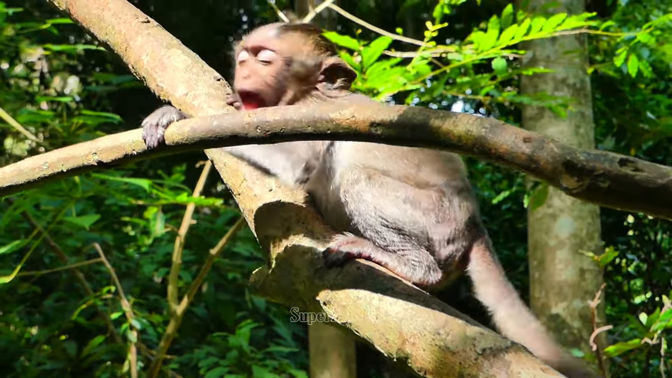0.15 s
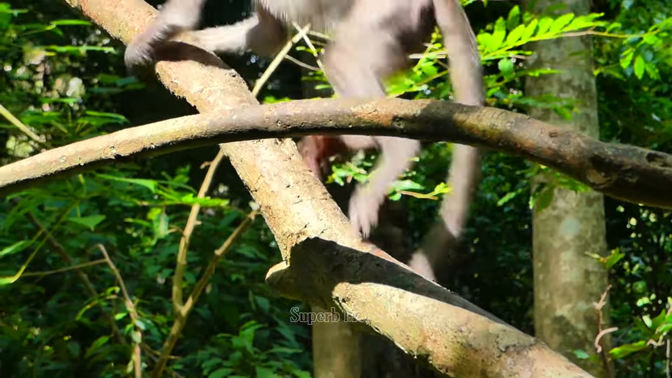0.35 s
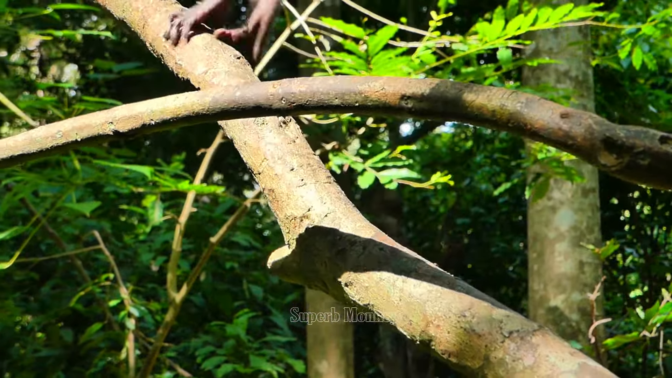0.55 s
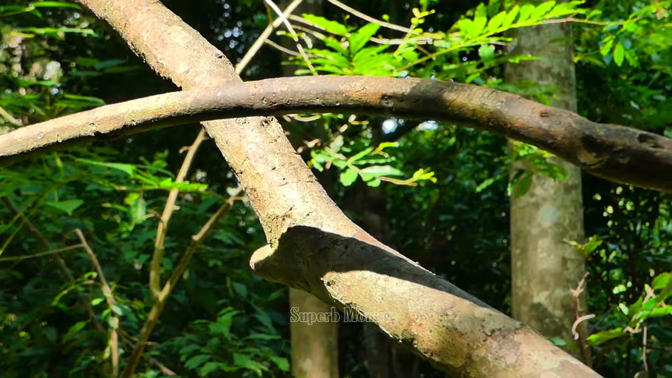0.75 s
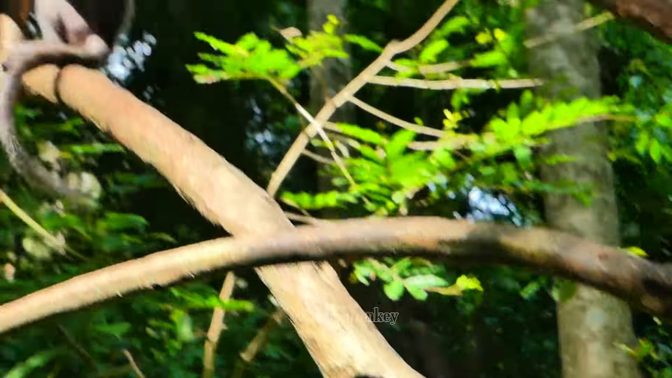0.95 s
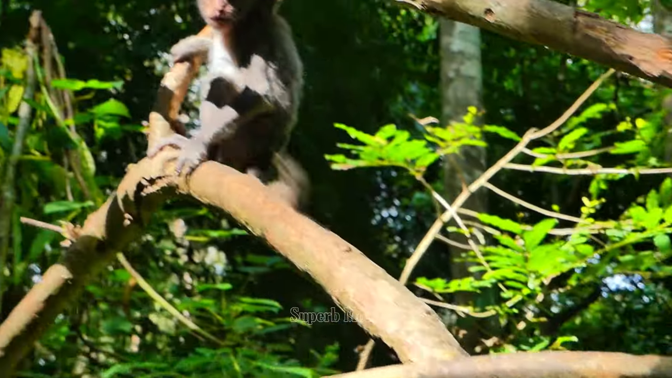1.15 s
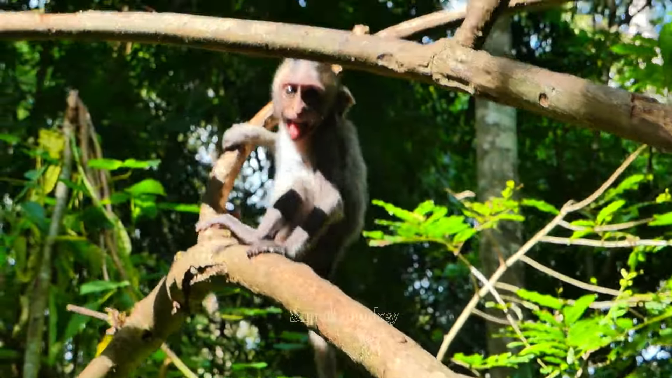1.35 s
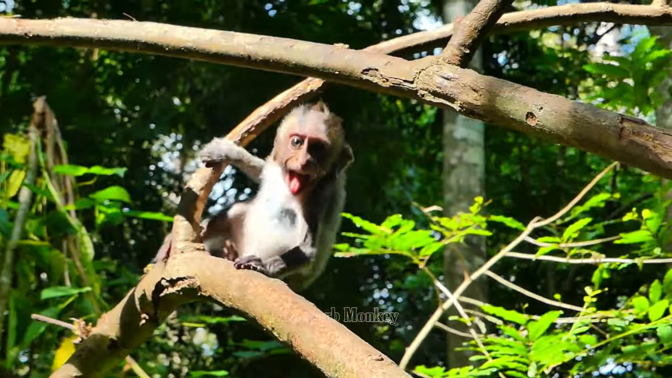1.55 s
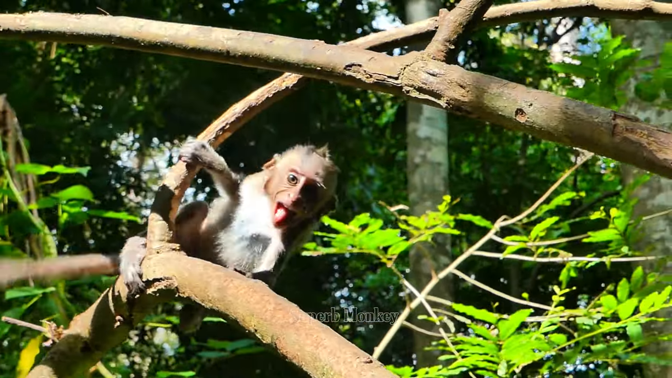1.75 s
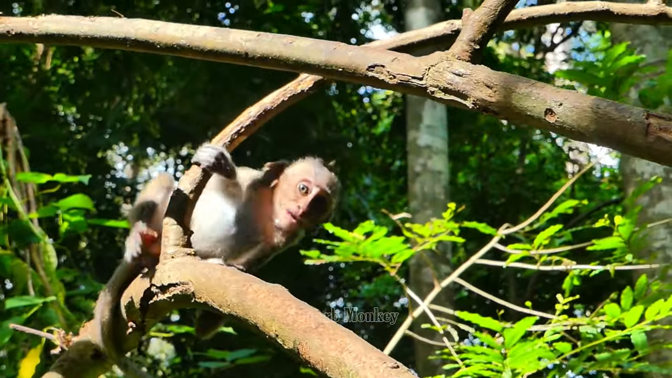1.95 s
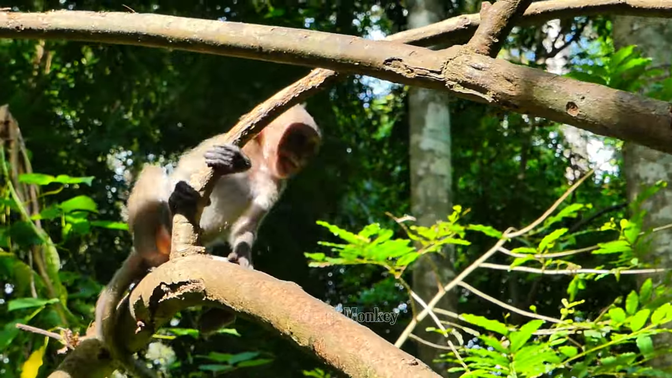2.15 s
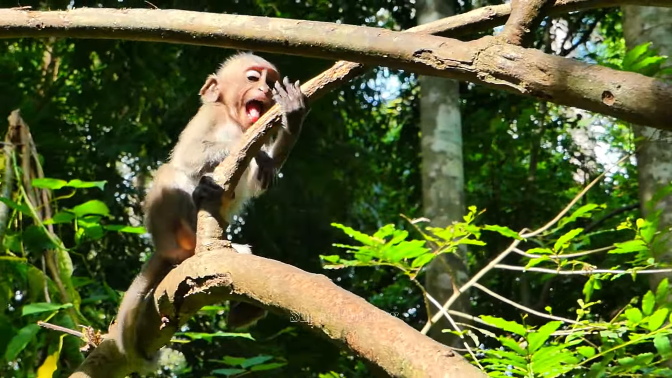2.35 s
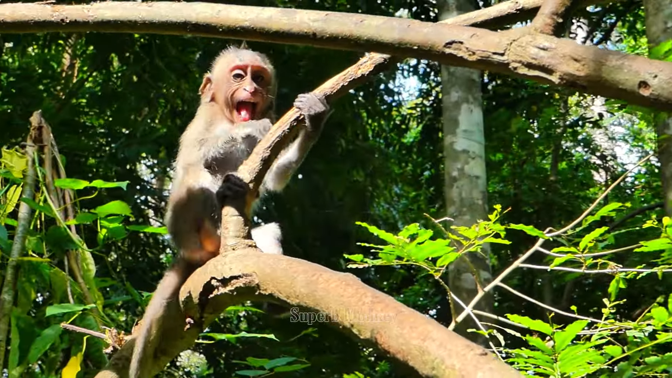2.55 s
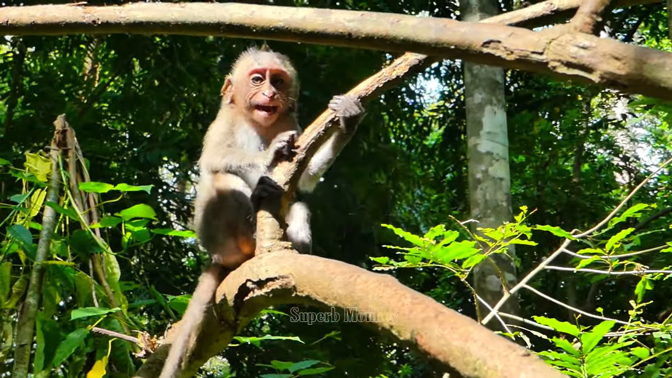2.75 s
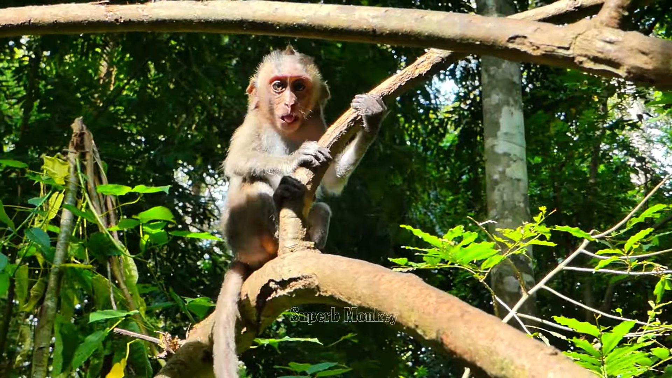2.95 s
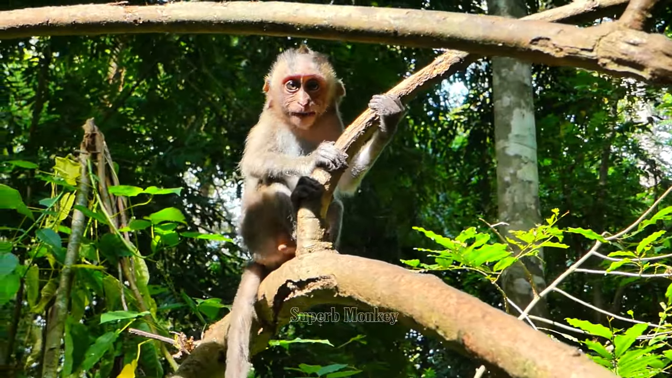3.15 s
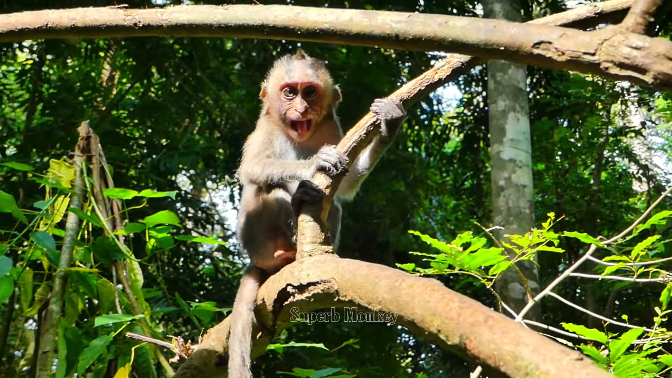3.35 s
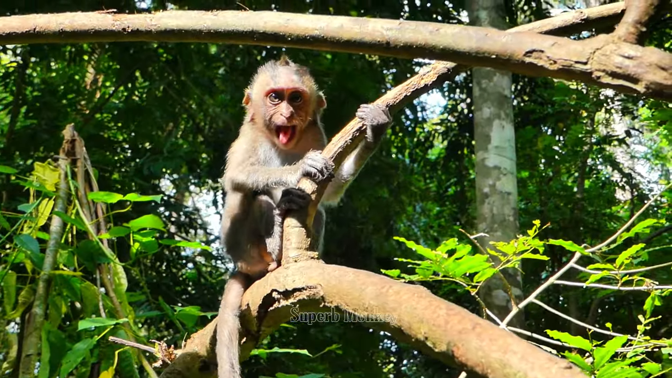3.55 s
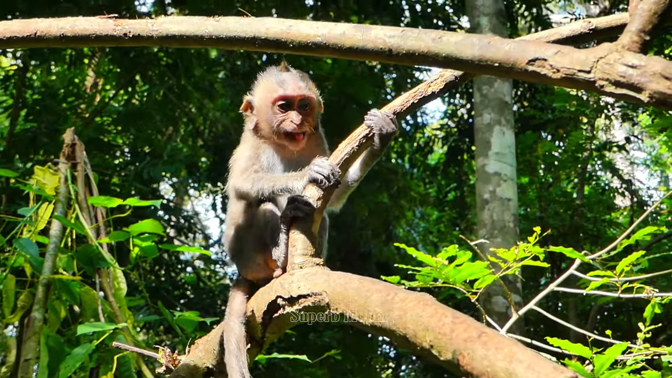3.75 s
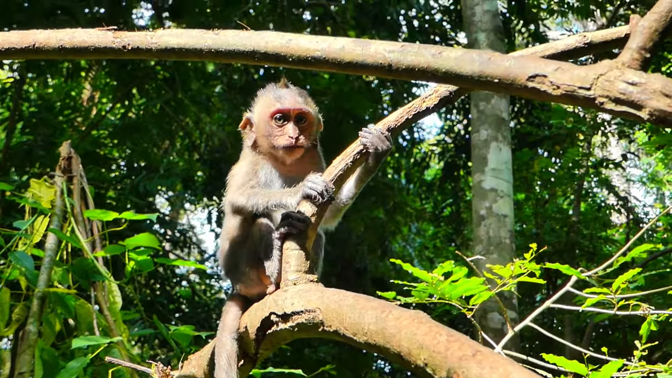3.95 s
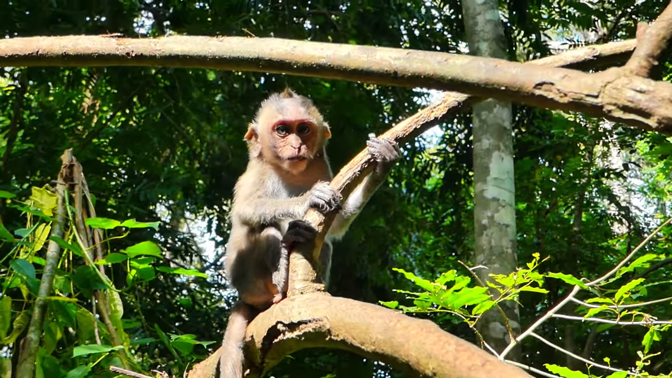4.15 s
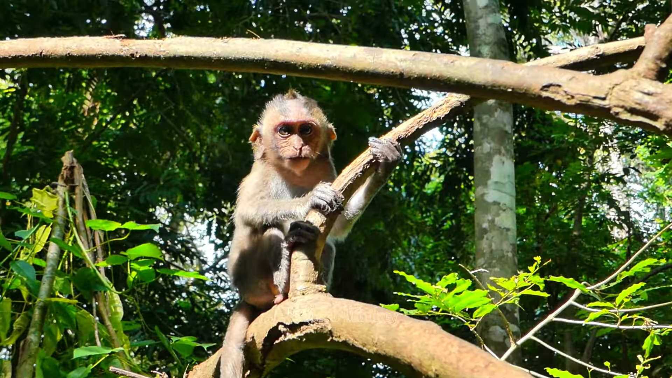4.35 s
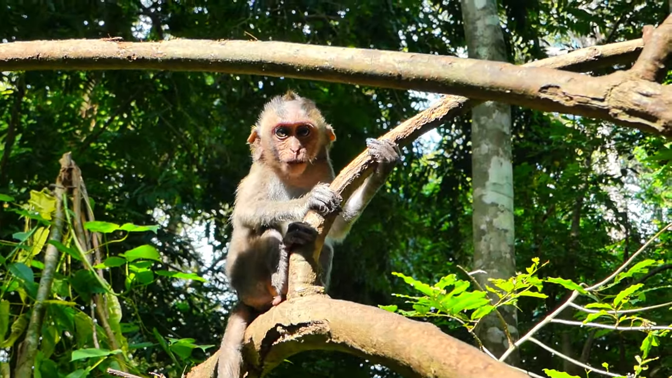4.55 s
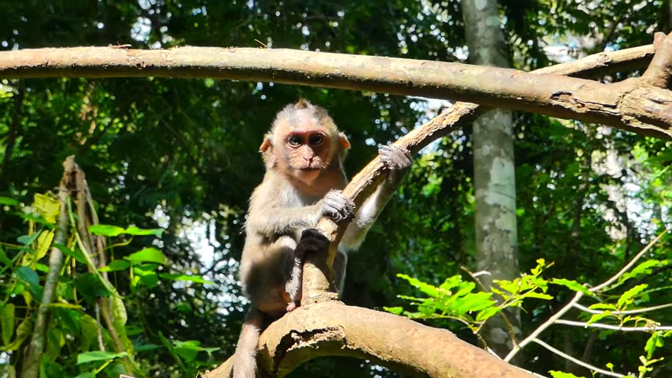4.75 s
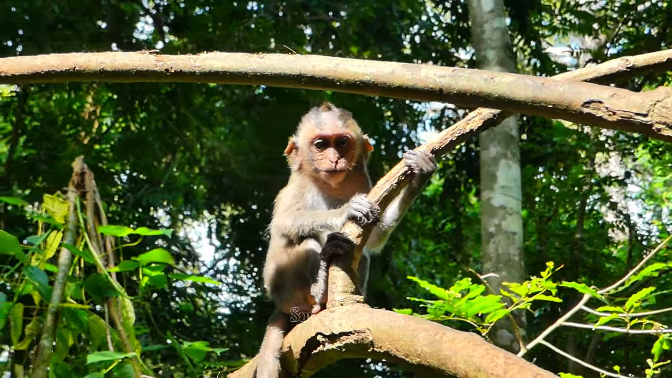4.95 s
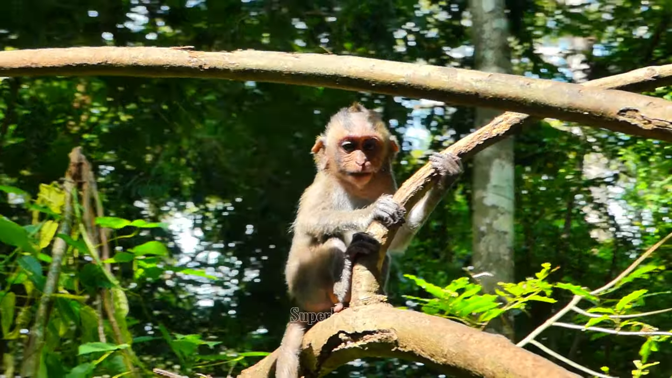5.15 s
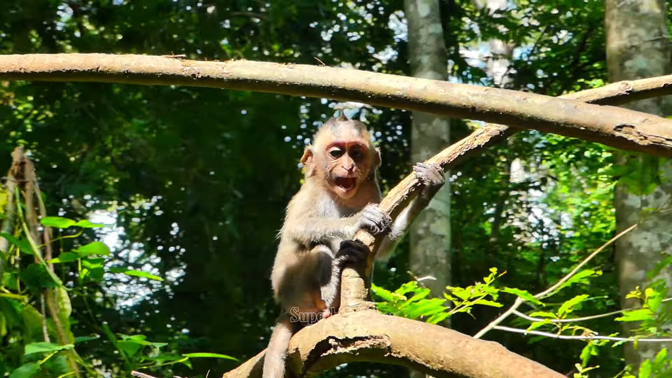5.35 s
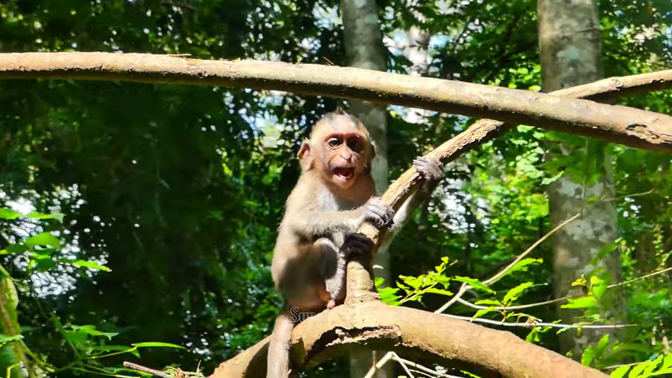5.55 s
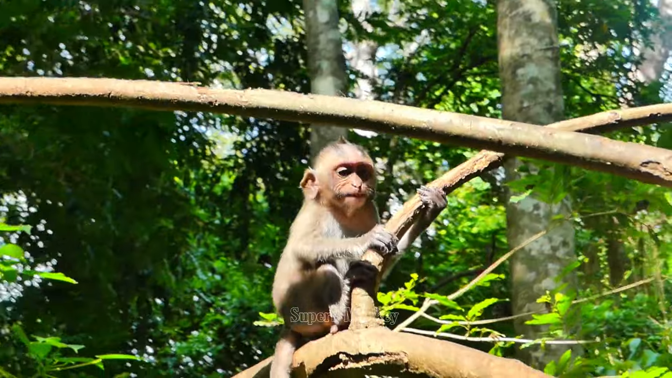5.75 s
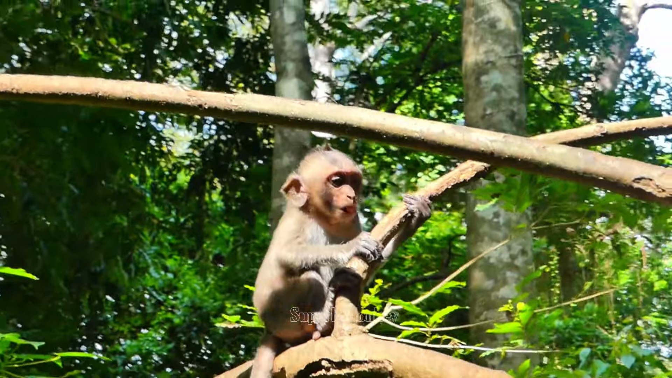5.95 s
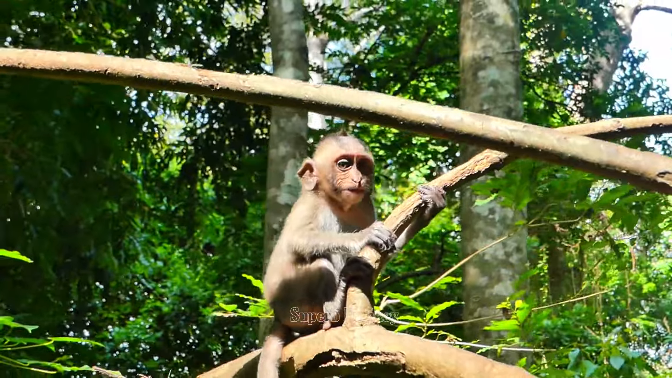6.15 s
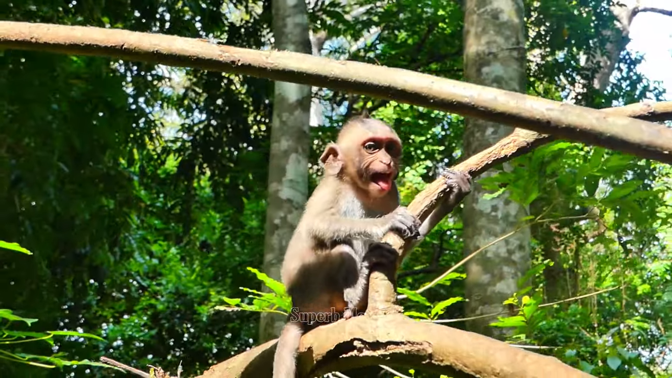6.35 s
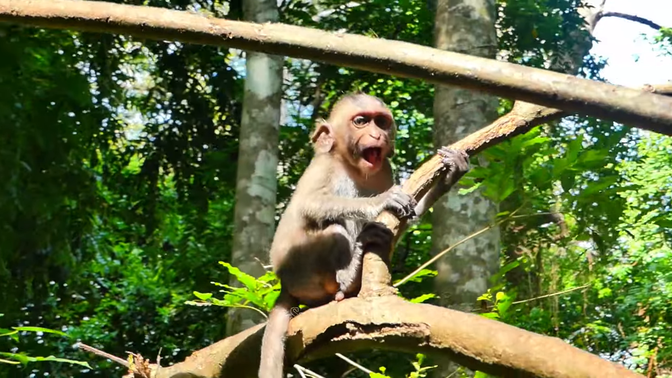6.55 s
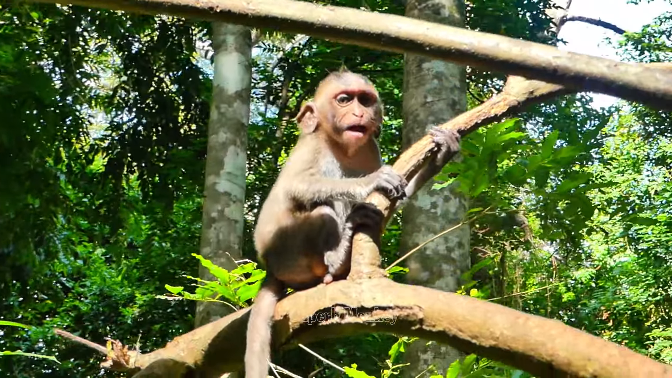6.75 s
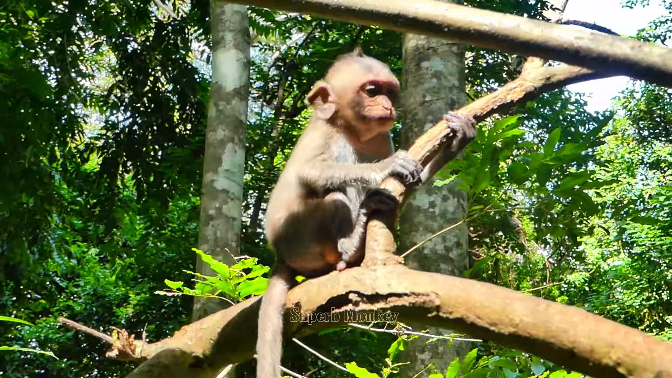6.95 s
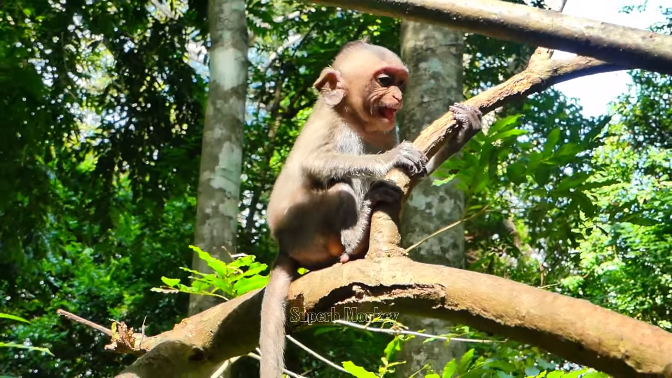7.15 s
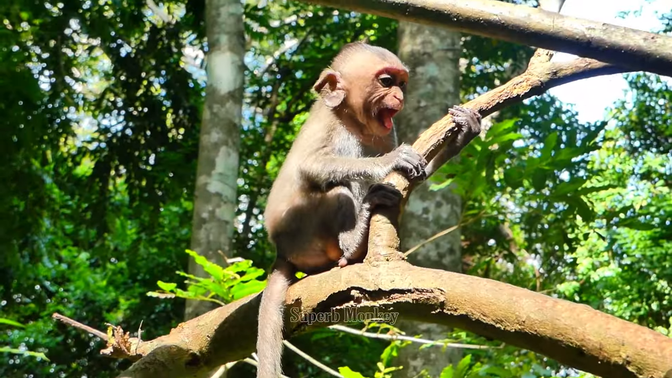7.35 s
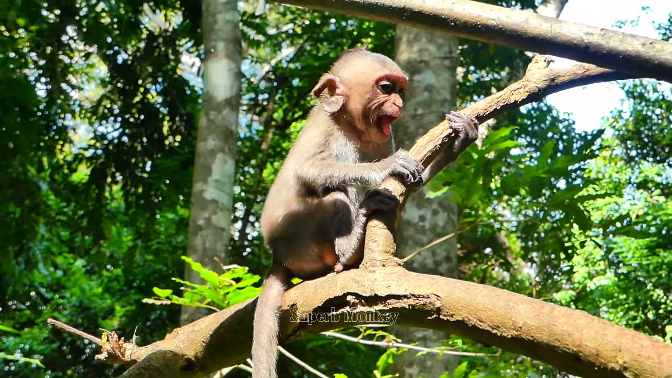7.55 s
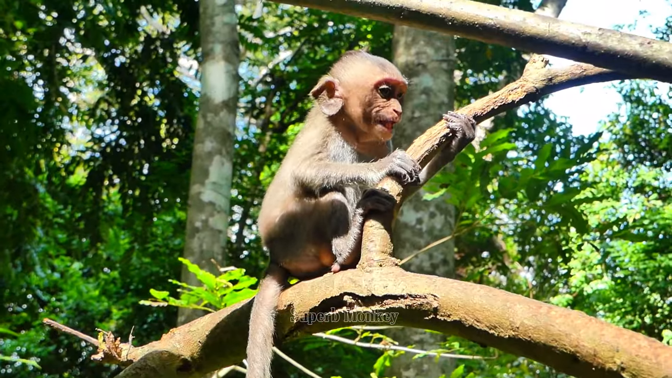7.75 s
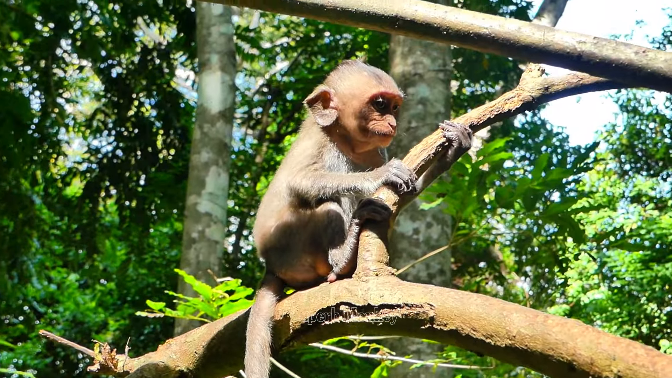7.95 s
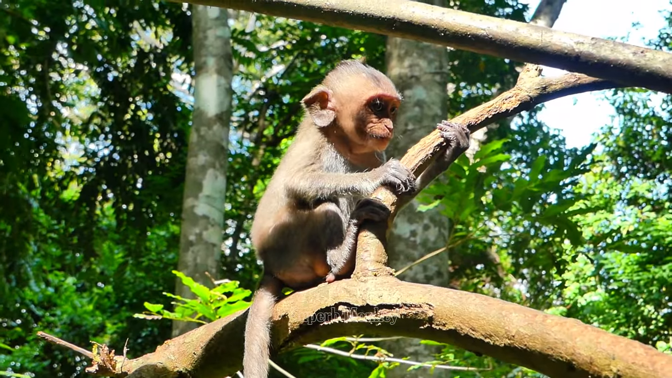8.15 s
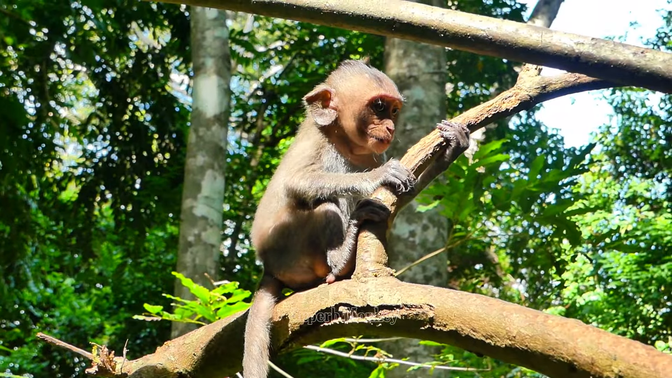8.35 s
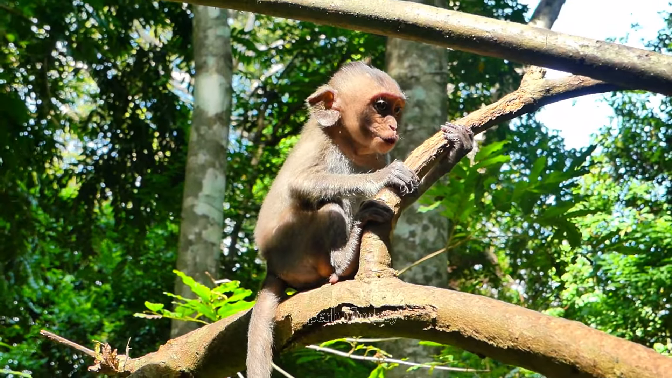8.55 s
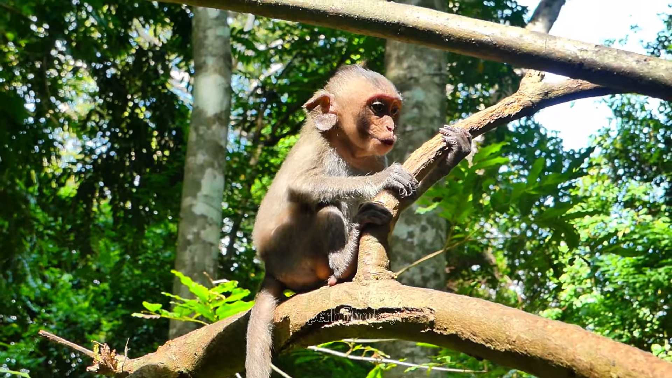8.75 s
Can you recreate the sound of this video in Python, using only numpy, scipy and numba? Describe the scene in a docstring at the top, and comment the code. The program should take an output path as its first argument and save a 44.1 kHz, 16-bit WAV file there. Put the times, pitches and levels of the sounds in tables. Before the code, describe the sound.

Outdoors among trees, a small monkey shrieks almost straight ahead of a stereo microphone. Five screams come in quick succession, very high and gliding, some broken by rough rasp, each dropping at its end. A quiet gap holds tiny twig and claw ticks, then three more thin wavering screams. Nearly a second of calm leads to a soft, clear coo. Trunks return short diffuse echoes over low distant traffic, engine throb, leaf rustle and faint insects.

```python
"""A young monkey on a branch a few metres off screams eight times and begins a soft coo, in a forest.
From the first scream its folds whistle in a high register that glides, breaks into rasp and doubles
its period as breath runs out; the coo at the end is a clear stack of partials from pursed lips.
Throughout, trunks scatter the near sounds back as fading noise, over distant traffic, leaf rustle and
an insect band made of noise, brief noise ticks of twigs and claws, and an idling engine's ringing puffs."""
import sys
import numpy as np
from scipy import signal
from scipy.fft import rfft, irfft
from scipy.io import wavfile
from scipy.ndimage import uniform_filter1d
from numba import njit

SR = 44100
rng = np.random.default_rng(int(sys.argv[2]) if len(sys.argv) > 2 else 0)


def bounce(signal):
    """Save signal as a 16-bit WAV file at the path given by the first command-line argument."""
    frames = np.transpose(np.atleast_2d(signal))
    limited = np.clip(frames, -1, 1)
    pcm = np.round(limited * 32767).astype(np.int16)
    wavfile.write(sys.argv[1], SR, pcm)


N = 388521
T = np.arange(N) / SR  # seconds
TOP_HZ = 15750  # upper limit of the recorder and of the overtones

# The path of each scream, one list per scream. Each row: time in seconds, pitch in Hz,
# whistle effort in dB before the throat colours it, throat rasp in dB before the cavities are mixed.
SCREAMS = [
    [(0.0, 7600, -46, -38), (.038, 7380, -35, -40), (.069, 7400, -29, -34.5), (.105, 6600, -45, -28),
     (.125, 5530, -33, -28.5), (.15, 3776, -31, -30), (.172, 3850, -35, -28), (.19, 3050, -38, -29),
     (.22, 2184, -37.5, -42)],
    [(.345, 1590, -71, -72), (.36, 1900, -41, -47), (.384, 2170, -32, -41), (.402, 3130, -42, -45),
     (.44, 3895, -51.5, -50.5), (.606, 4025, -64, -46.5), (.74, 3993, -50.5, -45.5),
     (.92, 4094, -45, -34.5), (.972, 3710, -41.5, -34.5), (1.01, 3320, -40, -30), (1.03, 2672, -39, -43)],
    [(1.305, 1826, -66, -76), (1.329, 2244, -41, -52), (1.353, 3565, -69, -41), (1.373, 3050, -38, -36),
     (1.39, 3600, -62, -37), (1.533, 3890, -63, -40), (1.842, 4460, -49, -38.5), (1.875, 4950, -34.5, -33),
     (1.887, 5400, -34.5, -37), (1.9, 5250, -37, -26), (1.909, 3700, -37.5, -27.5), (1.928, 3450, -38, -29),
     (1.946, 2394, -35, -33), (1.964, 2040, -43, -46)],
    [(2.155, 1792, -47.5, -75), (2.19, 2470, -50, -43.5), (2.254, 3470, -55, -41), (2.262, 7490, -41, -44),
     (2.35, 7620, -43, -39), (2.386, 8220, -33.5, -46), (2.43, 7400, -43, -34.5), (2.53, 7700, -40, -38.5),
     (2.58, 7150, -40, -36), (2.69, 7550, -40, -40), (2.712, 7000, -30.5, -26.5),
     (2.72, 5900, -33.5, -28.5), (2.75, 5255, -33.5, -29), (2.788, 4710, -36.5, -29.5),
     (2.797, 3000, -52, -37), (2.845, 1930, -76, -55)],
    [(3.158, 1126, -62, -71), (3.176, 1200, -46.5, -65), (3.2, 1347, -45, -55), (3.225, 2060, -45.5, -46),
     (3.244, 2200, -44, -62), (3.252, 2250, -74, -77), (3.259, 5770, -49, -75), (3.299, 5550, -46.5, -65),
     (3.335, 6420, -41, -56), (3.39, 6210, -41, -52), (3.428, 5110, -39, -42), (3.458, 5750, -44, -39),
     (3.482, 5470, -42, -41), (3.512, 6110, -46.5, -43), (3.575, 6280, -50.5, -50),
     (3.605, 5860, -43.5, -41.5), (3.641, 6070, -50, -40), (3.686, 5320, -43, -42), (3.743, 4140, -44, -47),
     (3.779, 2583, -39.5, -39.5), (3.809, 2030, -53, -36)],
    [(5.195, 860, -68, -72), (5.22, 1130, -57, -73), (5.229, 1235, -43.5, -73), (5.267, 1486, -41, -59),
     (5.291, 2130, -43.5, -53), (5.333, 4010, -59, -50), (5.36, 4430, -38, -50), (5.395, 5620, -31.5, -48),
     (5.423, 6820, -32.5, -49), (5.438, 7340, -36.5, -41), (5.502, 7400, -55, -43),
     (5.507, 6640, -33.5, -42), (5.532, 6070, -40, -39), (5.576, 5970, -37.5, -48), (5.6, 6300, -34.5, -40),
     (5.627, 5620, -38, -48), (5.678, 5070, -36, -44), (5.717, 4060, -42, -38.5), (5.753, 2626, -44, -37.5),
     (5.778, 2380, -50, -46)],
    [(6.195, 1320, -49, -75), (6.209, 1483, -43, -58), (6.24, 1387, -50, -48), (6.265, 2046, -42, -50),
     (6.277, 3690, -55, -43), (6.302, 4680, -46, -66), (6.331, 4460, -40, -38), (6.355, 4720, -41.5, -41),
     (6.397, 6260, -40.5, -53), (6.44, 6800, -40, -49), (6.466, 6450, -43, -41), (6.495, 5200, -42, -42),
     (6.52, 4770, -37.5, -38), (6.572, 5510, -43.5, -41), (6.578, 6050, -42, -38), (6.589, 6150, -44, -38),
     (6.613, 5140, -42, -37), (6.634, 5460, -36.5, -39), (6.673, 3580, -28.5, -44),
     (6.712, 3100, -38, -29.5), (6.746, 2354, -39, -36)],
    [(7.055, 929, -74, -79), (7.088, 1339, -42.5, -66), (7.127, 1384, -45, -47), (7.151, 2625, -40.5, -46),
     (7.169, 3910, -68, -38), (7.19, 4790, -43.5, -35), (7.241, 6390, -38.5, -44), (7.277, 6490, -37, -40),
     (7.295, 5700, -44, -32.5), (7.328, 5360, -38, -32.5), (7.37, 6420, -43, -44),
     (7.541, 5930, -42.5, -41), (7.598, 5430, -41, -46.5), (7.655, 3587, -38.5, -47),
     (7.682, 2566, -50, -38)],
]


def undb(db):
    """Decibels to gain."""
    return 10 ** (np.asarray(db) / 20)


def unit(x):
    """Scale to rms 1."""
    return x / np.sqrt(np.mean(x ** 2))


def columns(table):
    """Columns of a curve at every sample, the first column being seconds."""
    s, *cols = np.transpose(table)
    return [np.interp(T, s, c) for c in cols]


def held(rows):
    """One row per scream, held from its start to its end and gliding in the gaps."""
    return columns([(call[i][0], *row) for call, row in zip(SCREAMS, rows) for i in (0, -1)])


def spans(edges, size):
    """1 inside a span of seconds, 0 outside, with edges softened over size samples."""
    return uniform_filter1d(1. * ((T >= edges[0]) & (T <= edges[1])), size=size)


def colour(table, hz):
    """Read a spectrum on a log-frequency axis."""
    f, v = np.transpose(table)
    return np.interp(np.log(hz), np.log(f), v)


@njit
def svf(x, hz, width):
    """State-variable band-pass with moving centre, gain 1 there."""
    y, b, l = np.empty(len(x)), 0., 0.
    for i in range(len(x)):
        g, k = np.tan(np.pi * hz[i] / SR), width / hz[i]
        v = (b + g * (x[i] - l)) / (1 + g * (g + k))
        b, l, y[i] = 2 * v - b, l + 2 * g * v, k * v
    return y


def band(x, hz, width):
    """A steep resonance: the band-pass twice."""
    hz = hz + np.zeros(len(x))
    once = svf(x, hz, 1. * width)
    return svf(once, hz, 1. * width)


def walk(rate):
    """Random levels held 1 / rate s and slewed twice; spread 1."""
    k = max(int(SR / rate), 1)
    steps = np.repeat(rng.standard_normal(N // k + 1), k)
    slewed = uniform_filter1d(uniform_filter1d(steps, k), k)
    return unit(slewed[:N])


def monkey():
    """One pair of folds drives both a gliding whistle and a chaotic rasp; roughness shifts the balance."""
    # Level of the treble, one list per scream. Each row: time in seconds, reference level in dB.
    treble_rows = [
        [(0.0, -39.5), (0.096, -40), (0.134, -39.5), (0.202, -52), (0.22, -61)],
        [(0.345, -71), (0.381, -42.5), (0.435, -38), (0.509, -46.5), (0.839, -45.5), (0.893, -36.5),
         (1.003, -48), (1.03, -56)],
        [(1.305, -84), (1.321, -53.5), (1.361, -29), (1.369, -39.5), (1.619, -40.5), (1.653, -43), (1.867, -40),
         (1.965, -51)],
        [(2.155, -62), (2.193, -39), (2.399, -47), (2.429, -38.5), (2.677, -41.5), (2.723, -35.5), (2.771, -42),
         (2.845, -70)],
        [(3.155, -79), (3.209, -46), (3.237, -41.5), (3.243, -58), (3.479, -46.5), (3.555, -68), (3.719, -49),
         (3.81, -64)],
        [(5.195, -77), (5.229, -47), (5.267, -37), (5.301, -52.5), (5.395, -43), (5.483, -67), (5.697, -40.5),
         (5.78, -60)],
        [(6.19, -66), (6.208, -55.5), (6.268, -46.5), (6.312, -38.5), (6.596, -47), (6.64, -38), (6.724, -50),
         (6.748, -70)],
        [(7.055, -94), (7.089, -52), (7.117, -54), (7.187, -39), (7.353, -51), (7.367, -46.5), (7.665, -52),
         (7.682, -51)],
    ]
    # What each scream keeps. Each row: overtones over treble in dB, teeth rasp over treble in dB,
    # mouth over pitch as a ratio, pocket of the open mouth in Hz, time to open in seconds.
    character = [(-7, 6, 1, 6700, .1), (-4, 1.5, 0.95, 12200, 0.25), (-3, 3, 1.13, 12150, 0.18),
                 (0.5, 2.5, 1, 12740, 0.13), (-5.5, 4, 1.04, 8300, 0.11), (-4.5, 1.5, 1.02, 7480, 0.11),
                 (-1.5, 3, 1.03, 7100, 0.097), (-4, 2, 1.11, 10600, 0.45)]
    # Usual roughness of the folds in each scream, 0-1.
    usual_roughness = [.1, .53, .6, .2, .04, .03, .05, .17]
    # Spells of rougher or cleaner folds. Each row: start in seconds, end in seconds, roughness 0-1.
    spells = [(0, .035, .3), (.13, .19, .3), (1.0, 1.04, .3), (1.345, 1.388, .1), (1.865, 1.905, .1),
              (1.905, 1.945, .4), (1.945, 1.97, .14), (2.15, 2.34, .47), (2.35, 2.395, .09),
              (2.715, 2.795, .4), (2.8, 2.85, .08), (3.205, 3.255, .33), (6.24, 6.275, .35),
              (6.695, 6.715, .2), (7.05, 7.13, .03), (7.135, 7.172, .45), (7.185, 7.285, .05)]

    hz, effort_db, throat_db = columns(sum(SCREAMS, []))
    treble_db, = columns(sum(treble_rows, []))
    rich_db, bite_db, mouth_ratio, open_hz, open_s = held(character)
    usual, = held([(r,) for r in usual_roughness])
    start, = held([(call[0][0],) for call in SCREAMS])
    change = sum((r - usual) * spans((begin, end), size=600) for begin, end, r in spells)
    rough = np.clip(usual + change, 0, 1)

    jump_hz_per_s = 210000  # the voice cuts out in a leap faster than this
    glide_speed = uniform_filter1d(np.gradient(hz) * SR, size=300)
    leap = np.exp(-(glide_speed / jump_hz_per_s) ** 4)
    hz = uniform_filter1d(hz, size=300)  # the folds cannot turn on a point
    lines = leap * whistle(hz, effort_db, treble_db, rich_db, rough)

    mouth_hz = np.maximum(mouth_ratio * hz, 3370)  # the floor is the narrowest mouth
    opening = np.clip((T - start) / open_s, 0, 1) ** 2.3
    pocket_hz = 7600 + (open_hz - 7600) * opening
    noise = rasp(hz, throat_db, treble_db + bite_db, mouth_hz, pocket_hz, rough)
    voiced = sum(spans((call[0][0], call[-1][0]), size=400) for call in SCREAMS)
    return voiced * (lines + noise)


def whistle(hz, effort_db, treble_db, rich_db, rough):
    """Folds in a high register give a near-sine, richer when low, plus half-pitch lines as the period doubles."""
    # What the throat does to the whistle. Each row: frequency in Hz, gain in dB.
    line_colour = [(1200, 2), (2100, -1), (2650, -10), (3200, 1), (3650, 8), (4200, 2.75), (6500, 1.3),
                   (7500, -7)]
    # Relative strength of the overtones. Each row: frequency in Hz, gain in dB.
    overtone_colour = [(3000, -21), (6500, -11), (8000, -13.5), (10000, 0.5), (13000, 3), (15500, -6)]
    # Stretches of doubled period. Each row: start in seconds, end in seconds, half-pitch line in dB.
    doubling_rows = [(0.179, 0.221, -50), (0.974, 1.033, -52), (1.869, 1.9, -48.5), (1.91, 1.965, -52),
                     (2.793, 2.84, -56), (3.769, 3.809, -58.5), (5.448, 5.488, -59), (5.755, 5.78, -54),
                     (6.699, 6.747, -53), (7.138, 7.188, -60)]

    # unsteady folds: pitch and strength shake more with roughness, which smears the line
    shake = .3 * rough ** 2 * walk(900) + .002 * walk(90)
    phase = 2 * np.pi * np.cumsum(hz * (1 + shake)) / SR
    shimmer = undb((2.03 + 3.3 * rough) * walk(260))
    line_db = effort_db + colour(line_colour, hz)

    # the low register snaps shut and is rich; the high one is nearly a sine
    tilt = np.clip((hz - 1600) / 500, 0, 4)
    gains = [undb(colour(overtone_colour, k * hz)) * k ** -tilt * (k * hz < TOP_HZ) for k in range(2, 14)]
    overtones = sum(g * undb(2.79 * walk(150)) * np.sin(k * phase + k ** 2)
                    for k, g in enumerate(gains, start=2))
    overtones = overtones / np.sqrt(sum(g ** 2 for g in gains) + 1e-6)
    least_db, rough_loss_db = -16.5, -24.5  # part that follows effort; change at full roughness
    over_gain = undb(treble_db + rich_db) + undb(effort_db + least_db)
    over_gain = over_gain * undb(rough_loss_db * rough)

    doubling = sum(undb(db) * spans((begin, end), size=300) for begin, end, db in doubling_rows)
    half_pitch = np.sin(phase / 2) + 0.69 * np.sin(3 * phase / 2) + 0.49 * np.sin(5 * phase / 2)
    lines = undb(line_db) * np.sin(phase) + over_gain * overtones + doubling * half_pitch
    return np.sqrt(2) * shimmer * lines


def rasp(hz, low_db, high_db, mouth_hz, pocket_hz, rough):
    """Chaotic closure of the folds: dense uneven snaps ring the throat, mouth and teeth."""
    # Throat cavities. Each row: centre in Hz, width in Hz, relative level in dB.
    throat_rows = [(1900, 1500, -1), (3890, 1280, 10.5), (5460, 2600, 8), (6630, 1100, 3.5)]
    # Cavities at the teeth. Each row: centre in Hz, width in Hz, relative level in dB.
    teeth_rows = [(9400, 5000, -1.5), (12250, 3000, -9), (14800, 3500, -5.5)]

    # the snaps come in flurries
    flurry = undb(2.0 * rng.exponential(size=N) + 0.5 * walk(250) + 1.7 * walk(25))

    def snaps():
        """Each cavity has its own turbulence, all in step with the flurries."""
        return flurry * rng.standard_normal(N)

    throat = sum(undb(db + 2.2 * walk(90)) * unit(band(snaps(), f, w)) for f, w, db in throat_rows)
    mouth = unit(band(snaps(), np.clip(mouth_hz, 2000, 7200), 3140))
    teeth = sum(undb(db + 1.5 * walk(60)) * unit(band(snaps(), f * (1 + 0.062 * walk(11)), w))
                for f, w, db in teeth_rows)
    # breath noise hugs the second partial
    octave = unit(band(snaps(), np.clip(2.16 * hz, 8500, 15000), 4600))

    harsh = np.clip(.12 + 1.7 * rough, 0, 1)  # a wide-open harsh scream rings the fixed cavities
    high = harsh * unit(teeth) + (1 - harsh) * 0.38 * octave
    high = high - 0.95 * svf(high, pocket_hz, 2040.0)  # a side pocket swallows this band
    low = 0.53 * harsh * unit(throat) + 0.38 * undb(0.59 * walk(70)) * mouth
    # the rasp's lower band ends here
    low = signal.sosfilt(signal.butter(8, 7500, fs=SR, output="sos"), low)
    return undb(low_db) * low + undb(high_db) * high


def coo():
    """Lips pursed: a clear stack whose odd partials grow in as the period doubles."""
    # The closing coo. Each row: time in seconds, fundamental of the doubled period in Hz,
    # even partials in dB and odd partials in dB, both before colouring.
    coo_rows = [(8.525, 440, -73, -85), (8.54, 471, -62, -84), (8.556, 549, -52.5, -85),
                (8.575, 560, -47.5, -85), (8.6, 520, -53.5, -85), (8.635, 534.6, -53.5, -90),
                (8.69, 534, -52.5, -69), (8.73, 542, -54, -62), (8.81, 508, -57, -60)]
    # Colour of the pursed mouth. Each row: frequency in Hz, gain in dB.
    coo_colour = [(520, -15), (1060, 0), (2100, -4.5), (3200, -8.5), (5300, -13.5), (7500, -27),
                  (10500, -20.5), (13500, -22)]

    hz, even_db, odd_db = columns(coo_rows)
    phase = 2 * np.pi * np.cumsum(hz * (1 + 0.0034 * walk(100))) / SR
    stack = np.zeros(N)
    for k in range(1, 27):
        partial_db = odd_db if k % 2 else even_db
        level_db = colour(coo_colour, k * hz) + partial_db + 1.5 * walk(25)
        stack += undb(level_db) * np.sin(k * phase + k ** 2)
    return np.sqrt(2) * spans((coo_rows[0][0], N / SR), size=400) * stack


def ticks():
    """Twigs and claws: each tick is a few milliseconds of noise round its centre."""
    # Each row: start in seconds, peak in dB, centre in Hz.
    tick_rows = [(2.870, -36.5, 2600), (3.622, -41, 7940), (4.244, -50, 4760), (4.275, -49, 2170),
                 (5.383, -39, 1200), (6.152, -48, 6050), (8.408, -55, 8450), (8.57, -45, 594)]
    out, t = np.zeros(N), T[:600]
    for (s, db, hz), noise in zip(tick_rows, rng.standard_normal((len(tick_rows), 600))):
        tick = band(noise * np.exp(-t / 0.0033), hz, hz)
        i = int(s * SR)
        out[i:i + 600] += undb(db) * tick / np.abs(tick).max()
    return out


def trunks(x):
    """Trunks and leaves scatter the sound back as fading noise, unlike left and right."""
    # Each row: centre in Hz, width in Hz, energy of the returning tail in dB,
    # time to fade by 60 dB in seconds.
    trunk_rows = [(3570, 1060, -25.5, 0.5), (4000, 3300, -23.5, 0.17), (10800, 16400, -13.5, 0.3),
                  (1720, 3400, -20, 0.22)]
    t = T[:SR // 2]
    onset = np.clip(t / 0.00067, 0, 1)

    def tail():
        """One side's echo: bands of noise, each fading at its own pace."""
        total = np.zeros(len(t))
        for f, w, db, t60 in trunk_rows:
            noise = unit(band(rng.standard_normal(len(t)), f, w))
            fade = np.exp(-np.log(1000) * t / t60)
            total += undb(db) * noise * fade / np.sqrt(t60 * SR / 14)  # keeps the energy free of t60
        return total * onset

    return np.array([signal.fftconvolve(x, tail())[:N] for _ in range(2)])


def forest():
    """Traffic wash, leaf rustle that flickers and an insect band that flutters, with the engine behind."""
    # Each row: time in seconds, then distant traffic, leaves and insect in dB before fixed trims.
    forest_rows = [(0, -63, -71.5, -81), (3, -64, -71, -88), (4.6, -66.5, -72, -77), (4.9, -67, -65.5, -78),
                   (5.4, -65.5, -71, -73.5), (8, -68.5, -72, -70.5), (8.81, -70.5, -75, -72)]
    # Spectrum of the distant traffic. Each row: frequency in Hz, relative level in dB per Hz.
    traffic_colour = [(18, -63), (30, -22), (107, -5), (228, -9.5), (337, -10.5), (643, -9), (1040, -13),
                      (4670, -25.5), (7400, -28), (9620, -68), (16300, -120)]
    # Spectrum of the leaf rustle. Each row: frequency in Hz, relative level in dB per Hz.
    leaf_colour = [(2000, -5), (4000, 1), (7000, -3), (10000, -0.5), (13000, -6), (15500, -13)]

    traffic_db, leaves_db, insect_db = columns(forest_rows)
    traffic = unit(shaped(traffic_colour)) * undb(traffic_db + 8 + 1.01 * walk(8.9))
    rustle = unit(shaped([(500, -75.5)] + leaf_colour))  # next to nothing at 500 Hz and below
    leaves = rustle * undb(leaves_db + 2.5 + 1.0 * walk(28))
    chirr = unit(band(rng.standard_normal(N), 6982, 260))
    insect = chirr * undb(insect_db - 1.5 + 2.99 * walk(50))
    return traffic + leaves + insect + engine()


def shaped(table):
    """Stereo noise of a given spectrum, as alike left and right as the far field is."""
    # Each row: frequency in Hz, left-right likeness from 0 to 1.
    alike_rows = [(60, 0.092), (300, 0.3), (1400, 0.51), (6800, 0.77), (15000, 0.38)]
    # Each row: frequency in Hz, left minus right in dB.
    lean_rows = [(60, 7), (150, -0.5), (400, -2.5), (1500, 1)]
    hz = np.maximum(np.arange(N // 2 + 1) * SR / N, 1)
    mid, side = rfft(rng.standard_normal((2, N)))
    alike = np.clip(colour(alike_rows, hz), 0, 1)
    lean = undb(colour(lean_rows, hz) / 2)
    mid, side = mid * np.sqrt(1 + alike), side * np.sqrt(1 - alike)
    pair = np.array([(mid + side) * lean, (mid - side) / lean])
    return irfft(undb(colour(table, hz)) * pair, N)


def engine():
    """A distant idling engine: uneven firings ring a shared beat under boom noise that differs left and right."""
    # Each row: time in seconds, boom centre in Hz, level in dB.
    engine_rows = [(0, 162, -62), (1.5, 162, -60.5), (3, 134.1, -61.5), (4.5, 114.7, -60.5),
                   (6, 114.7, -65), (8.81, 123.9, -73.5)]
    firing_hz = 24.77
    boom_hz, db = columns(engine_rows)
    cycle = np.cumsum(firing_hz * (1 + 0.04012 * walk(16))) / SR
    puffs = np.diff(np.floor(cycle), prepend=0) * undb(2 * walk(30))  # one click per firing
    beat = unit(band(puffs, boom_hz, 70))
    # each side adds its own noise in the boom band to the shared beat
    sides = [unit(beat + 1.46 * unit(band(rng.standard_normal(N), boom_hz, 72))) for _ in range(2)]
    return undb(db) * np.array(sides)


def scene():
    """The monkey sits almost straight ahead, a touch louder on the left, with the forest around it."""
    near = monkey() + coo() + ticks()
    return near * undb([[.3], [-.3]]) + trunks(near) + forest()


def record(dry):
    """The recorder cuts the top with a steep low-pass."""
    return signal.sosfilt(signal.ellip(10, .2, 70, TOP_HZ, fs=SR, output="sos"), dry)


dry = scene()
out = record(dry)
bounce(out)
```